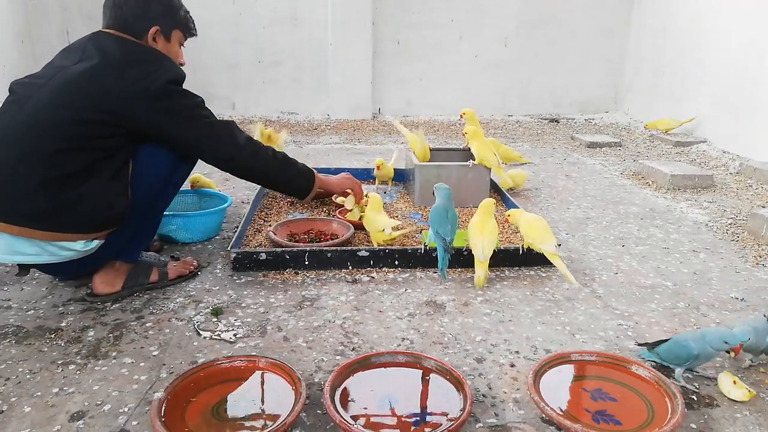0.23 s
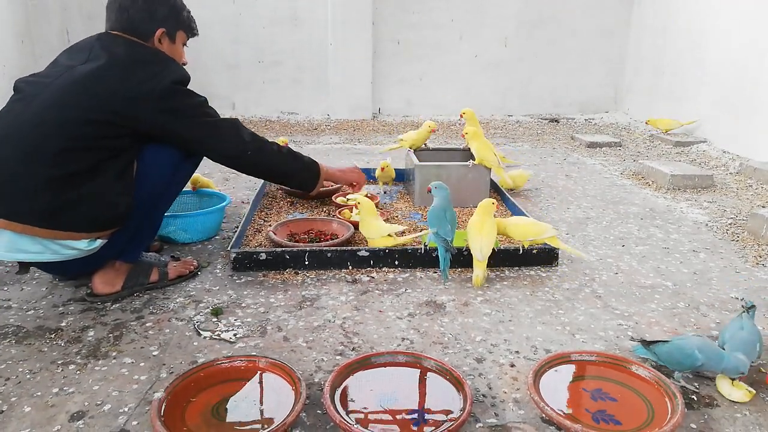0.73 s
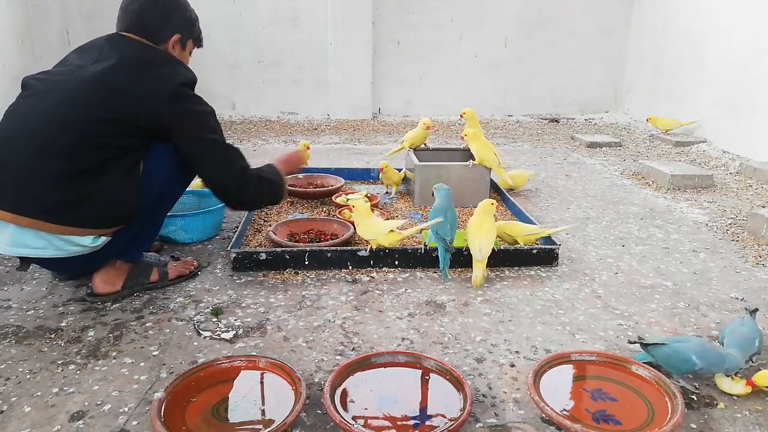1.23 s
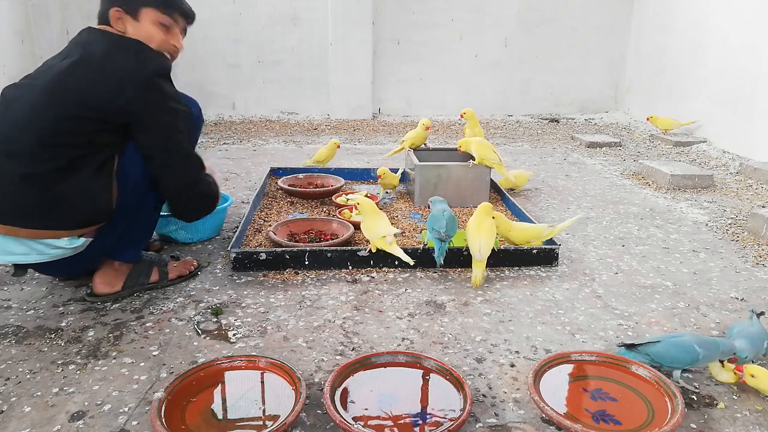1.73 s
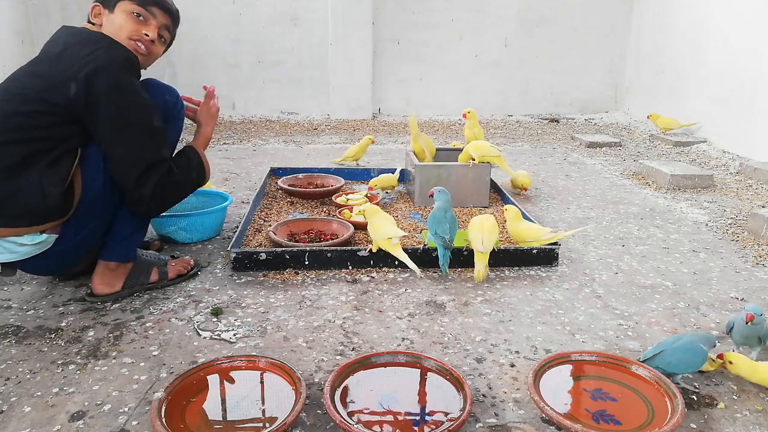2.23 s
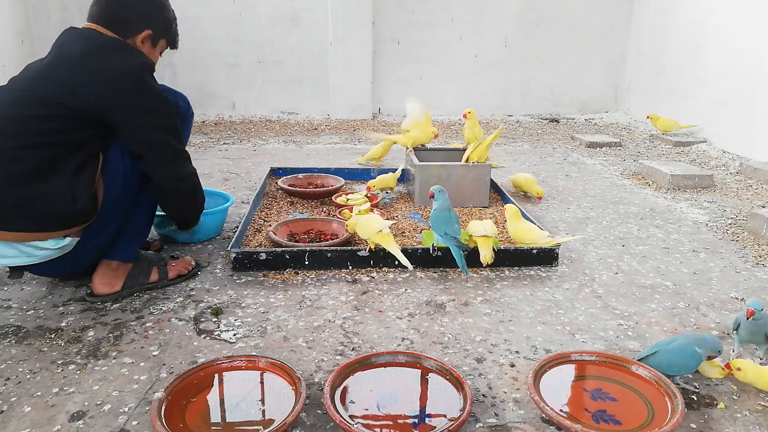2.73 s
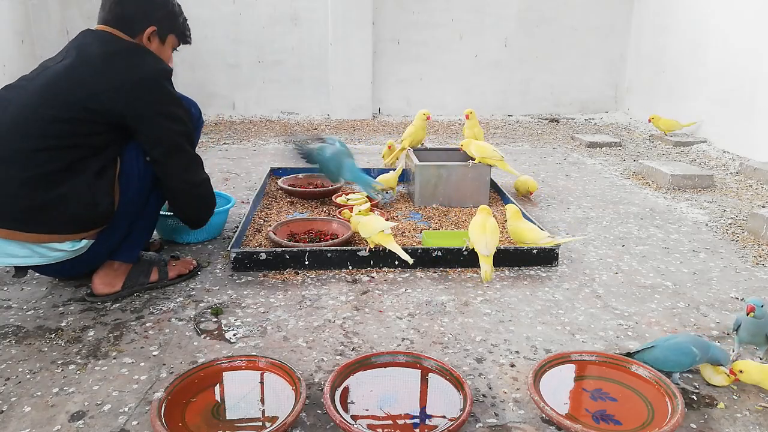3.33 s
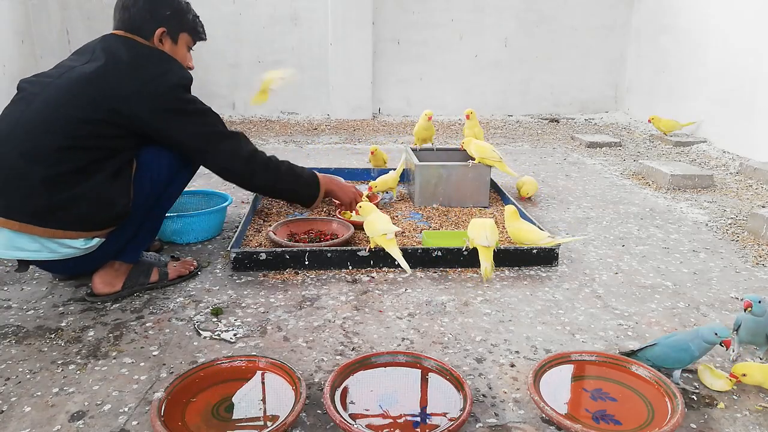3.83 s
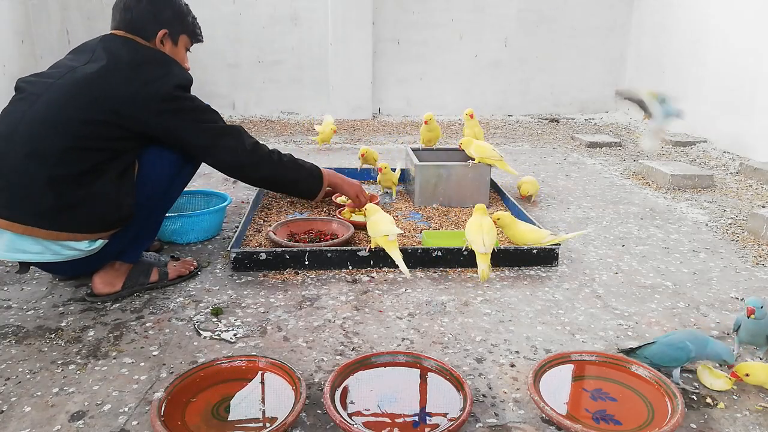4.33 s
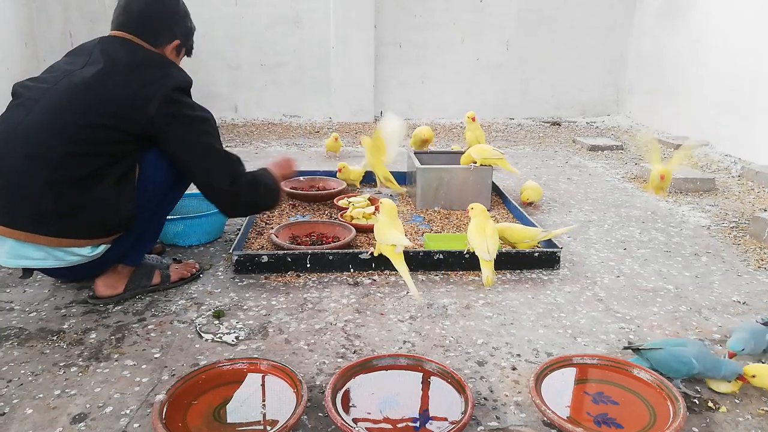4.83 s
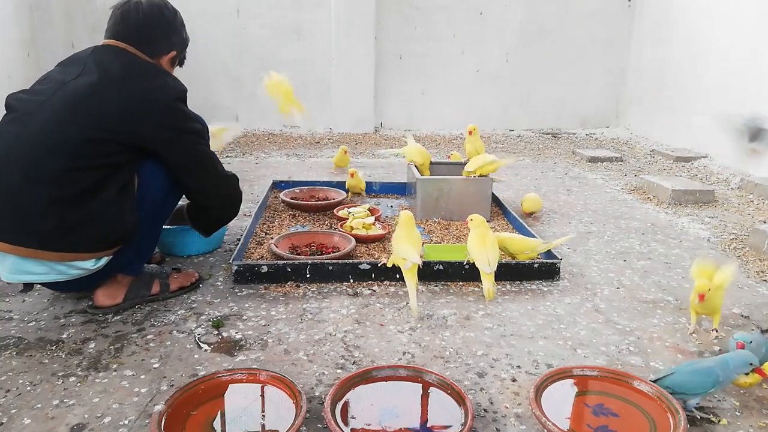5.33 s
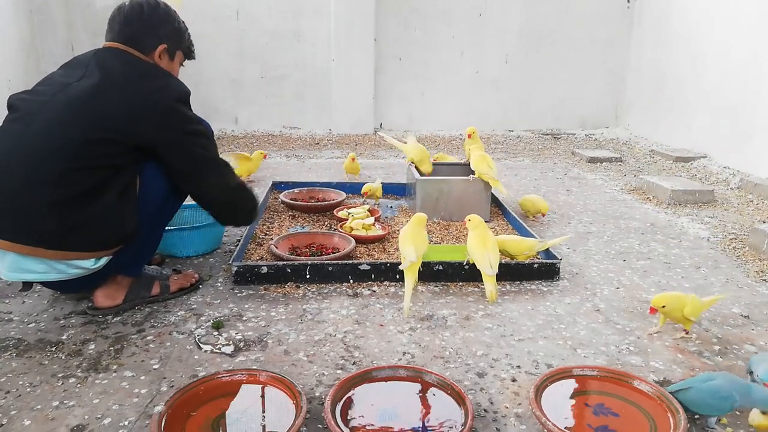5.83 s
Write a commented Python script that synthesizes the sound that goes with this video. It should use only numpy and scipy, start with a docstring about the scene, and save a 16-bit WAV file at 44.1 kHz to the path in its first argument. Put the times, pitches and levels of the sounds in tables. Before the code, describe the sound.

Four loud, raspy parakeet screeches in quick succession, then seed cracking, soft wing flutters and a more distant hoarse call over faint town rumble.

```python
"""A walled concrete aviary with parakeets at a seed tray. One gives four harsh screeches, a jittering
harmonic voice on a pitch arch, shaped by throat and beak; another answers hoarsely from farther off.
Husks snap, feed rustles, beaks tap, feet scuff, wingbeats puff air and distant birds chirp faintly.
A far horn sounds over the low rumble of the town. Gain control ducks under the screeches."""
import sys
import numpy as np
from scipy import signal
from scipy.fft import rfft, irfft
from scipy.io import wavfile
from scipy.ndimage import uniform_filter1d, minimum_filter1d

SR = 44100
rng = np.random.default_rng(int(sys.argv[2]) if len(sys.argv) > 2 else 0)


def log_audio(samples):
    """Write samples as a 16-bit WAV file to the path given in sys.argv[1]."""
    # one column per channel
    frames = np.atleast_2d(samples).T
    # limit to full scale, then quantise
    limited = np.clip(frames, -1, 1)
    pcm = np.round(limited * 32767).astype(np.int16)
    wavfile.write(sys.argv[1], SR, pcm)


N = 268480
TIME = np.arange(N) / SR


def amp(db):
    """Decibels to gain."""
    return 10 ** (np.asarray(db) / 20)


def unit(x):
    """Scales to rms 1."""
    return x / np.sqrt(np.mean(x ** 2) + 1e-20)


def steady(x):
    """Holds the short-time rms at 1."""
    return x / np.sqrt(abs(uniform_filter1d(x ** 2, size=500)) + 1e-9)


def read(points, hz):
    """Reads a spectrum on a log-frequency axis."""
    f, value = np.transpose(points)
    return np.interp(np.log(hz + 1), np.log(f + 1), value)


def colour(x, points):
    """Filters by a spectrum in dB."""
    size = x.shape[-1]
    return irfft(rfft(x) * amp(read(points, np.fft.rfftfreq(size, 1 / SR))), size)


def wobble(size, hz):
    """Random motion of rms 1, rolled off above hz."""
    f = np.fft.rfftfreq(size, 1 / SR)
    return unit(irfft(rfft(rng.standard_normal(size)) / np.sqrt(1 + (f / hz) ** 4), size))


def phase_rad(hz):
    """Integrates frequency to phase."""
    return 2 * np.pi * np.cumsum(hz) / SR


def add(mix, at_s, sound):
    """Mixes a sound in at a given time."""
    start = round(at_s * SR)
    sound = sound[..., max(-start, 0):]
    part = mix[..., max(start, 0):][..., :sound.shape[-1]]
    part += sound[..., :part.shape[-1]]


# wall decay: f/Hz, T60/s
WALL_T60 = [(300, 0.86), (1500, 0.38), (3500, 0.48), (6000, 0.39), (9000, 0.35), (14000, 0.27)]
# floor and wall reflections: left delay/s, right delay/s, level/dB re direct
ECHOES = [(.0021, 0.0018, 1.5), (.0068, 0.0092, -1), (0.0116, 0.013, -10.5), (0.018, .0205, -16),
          (0.028, 0.015, -9)]


def aviary(x, direct_db, wet_db, left_lag_s=0):
    """Direct sound, single reflections and a diffuse tail between bare walls."""
    count = SR // 20 - 20
    taps = np.zeros((2, SR))
    at = 300 + 20 * np.arange(count) + rng.integers(0, 20, (2, count))
    np.put_along_axis(taps, at, rng.choice([-1., 1.], at.shape), 1)
    hz, t, spectra = signal.stft(taps, SR, nperseg=256)
    decay = amp(-60 * t / read(WALL_T60, hz)[:, None])
    tail = signal.istft(spectra * decay, SR, nperseg=256)[1]
    room = amp(wet_db) * tail / np.linalg.norm(tail[0])
    room[0, round(max(left_lag_s, 0) * SR)] += amp(direct_db)
    room[1, round(max(-left_lag_s, 0) * SR)] += amp(direct_db)
    for left_s, right_s, db in ECHOES:
        room[[0, 1], [round(left_s * SR), round(right_s * SR)]] += amp(direct_db + db)
    return signal.fftconvolve(x[None], room, axes=1)[:, :N]


# town spectrum: f/Hz, gain/dB
RUMBLE_COLOUR = [(20, -1), (60, -3), (105, -4), (166, -11), (230, -15), (424, -18.5), (800, -19.5),
                 (1500, -24), (2500, -61.5)]
# town swell and ebb: t/s, relative level/dB
RUMBLE_LEVEL = [(0, -50), (.6, -55.5), (1.2, -56.5), (2.5, -48.5), (3.3, -55), (4.0, -54), (5.1, -52.5),
                (6.1, -53)]
# left-right likeness: f/Hz, correlation
RUMBLE_CORRELATION = [(60, 1), (130, 1), (290, 0.68), (640, -0.79), (1400, 0.42), (3000, 0)]


def town_rumble(gain_db=4, swell_db=2.5):
    """Swelling town noise, its bass alike at both microphone ports."""
    left, independent = rng.standard_normal((2, N))
    likeness = np.clip(read(RUMBLE_CORRELATION, np.fft.rfftfreq(N, 1 / SR)), -1, 1)
    right = irfft(likeness * rfft(left) + np.sqrt(1 - likeness ** 2) * rfft(independent), N)
    level_db = gain_db + np.interp(TIME, *np.transpose(RUMBLE_LEVEL)) + swell_db * wobble(N, 11)
    return unit(colour(np.array([left, right]), RUMBLE_COLOUR)) * amp(level_db)


# engine notes: f/Hz, relative level/dB
ENGINE_NOTES = [(120, -58), (212, -59.5), (285, -63)]


def engines(waver=0.0094):
    """Far engines drone on wavering notes, louder as they draw nearer."""
    drone = sum(amp(db) * wobble(N, 6.6) * np.sin(phase_rad(hz * (1 + waver * wobble(N, 2))))
                for hz, db in ENGINE_NOTES)
    return drone * amp(np.interp(TIME, [2.5, 4.6], [-5, 1.5]))


# hiss spectrum: f/Hz, gain/dB
HISS_COLOUR = [(410, -34), (700, -3), (1020, -7), (1110, -5.5), (1310, -0.5), (2430, -3), (3160, -3),
               (6230, -6), (9600, 2), (15200, -17), (16000, -18.5)]
# hiss before and after the screeches, one list each: t/s, relative level/dB
HISS_LEVEL = [
    [(0.0, -51), (0.236, -56.5), (0.432, -57), (0.664, -63.5), (0.932, -60), (1.248, -56), (1.35, -60.5)],
    [(2.75, -57), (3.04, -57), (3.57, -58), (3.88, -57.5), (5.41, -55.5), (5.72, -57), (6.0, -57)],
]


def feeding_hiss(gain_db=7, flicker_db=1.1):
    """Feeding birds blur into a restless hiss."""
    hiss = unit(colour(rng.standard_normal((2, N)), HISS_COLOUR))
    return hiss * amp(gain_db + np.interp(TIME, *np.vstack(HISS_LEVEL).T) + flicker_db * wobble(N, 20))


# horn partials: f/Hz, level/dB
HORN_CHORD = [(468, -75), (1130, -68), (1669, -72), (1739, -70)]


def horn(waver=0.0047):
    """A far vehicle horn holds a wavering chord."""
    chord = np.zeros(N)
    for hz, db in HORN_CHORD:
        flicker = 1 + 1.2 * wobble(N, 29)
        chord += amp(db) * flicker * np.sin(phase_rad(hz * (1 + waver * wobble(N, 34))))
    gate = np.interp(TIME, [.9, 1.05, 1.36, 1.45], [0, 1, 1, 0])
    return aviary(chord * gate, direct_db=1, wet_db=1)


# distant calls: t/s, length/s, f/Hz, width/Hz, level/dB
CHIRPS = [(-.04, 0.1, 1880, 610, -52), (0.396, 0.071, 3060, 1110, -57), (0.867, 0.15, 2940, 150, -67),
          (0.892, 0.1, 4640, 300, -64.5), (2.71, 0.18, 4930, 593, -50.5), (2.805, 0.06, 1422, 700, -48),
          (2.868, 0.08, 1466, 286, -44), (3.46, 0.18, 6370, 246, -61.5), (4.043, 0.39, 3560, 2200, -59.5)]


def chirps():
    """Distant bird calls, blurred to bands of noise."""
    out = np.zeros(N)
    for at_s, length_s, hz, width_hz, db in CHIRPS:
        t = np.arange(int(length_s * SR)) / SR
        call = wobble(len(t), width_hz / 2) * np.sin(2 * np.pi * hz * t)
        add(out, at_s, amp(db) * unit(call) * signal.windows.tukey(len(t), .6))
    return aviary(out, direct_db=1, wet_db=-2.5)


# soft rubs: t/s, length/s, centre f/Hz, level/dB
SCUFFS = [(.01, .12, 302, -63), (0.453, 0.099, 925, -58.5), (2.287, 0.13, 377, -49.5),
          (3.374, 0.067, 1230, -58), (4.384, .068, 600, -56), (4.8, 0.11, 800, -54.5),
          (5.007, 0.22, 278, -54.5), (5.239, 0.12, 312, -54)]


def scuffs():
    """Sandals, sleeves and feet on the tray rub: dull noise about an octave wide."""
    out = np.zeros(N)
    for at_s, length_s, hz, db in SCUFFS:
        size = int(length_s * SR)
        band = [(hz / 8, -50), (hz / 2, -12), (hz, 0), (hz * 2, -14), (hz * 8, -60)]
        brush = colour(rng.standard_normal(size), band)
        add(out, at_s, amp(db) * unit(brush * signal.windows.tukey(size, .7)))
    return np.array([out, out])


# flights: t/s, length/s, level/dB
FLIGHTS = [(-.1, 0.25, -57.5), (3.15, 0.52, -54.5), (4.2, 0.3, -54), (4.799, 0.58, -48)]
# air puff spectrum: f/Hz, gain/dB
WING_COLOUR = [(60, -4), (220, 6), (400, -0.5), (900, -7), (2000, -39.5), (6000, -19), (14000, -21)]


def wings(beat_hz=13):
    """Each wingbeat pushes a soft puff of air."""
    out = np.zeros(N)
    for at_s, length_s, db in FLIGHTS:
        size = int(length_s * SR)
        beat = np.sin(phase_rad(beat_hz * (1 + 0.094 * wobble(size, 4.8))) / 2) ** 2
        puffs = colour(rng.standard_normal(size), WING_COLOUR) * (0.25 + beat)
        add(out, at_s, amp(db) * unit(puffs) * signal.windows.tukey(size, .6))
    return aviary(out, direct_db=-12.5, wet_db=-7)


def pecks(count=70, softest_db=-50, range_db=8, ring_s=.003):
    """Small beaks tap at random, each tap with its own pitch."""
    out, t = np.zeros(N), np.arange(1500) / SR
    for when, pitch, force in rng.random((count, 3)):
        hz = 700 * 14 ** pitch
        tap = unit(colour(rng.standard_normal(len(t)), [(hz / 3, -25), (hz, 0), (hz * 2, -25)]))
        add(out, when * N / SR, amp(softest_db + range_db * force) * tap * np.exp(-t / ring_s))
    return aviary(out, direct_db=-7, wet_db=-1.5)


# seeds cracked and dropped, claws on the tray: t/s, level/dB, low-cut f/Hz
TICKS = [(0.168, -35.5, 4500), (0.32, -37, 2000), (.554, -35, 2000), (1.26, -29, 4630), (2.813, -34, 3500),
         (2.973, -38, 4000), (3.385, -34.5, 8000), (3.646, -27, 4000), (3.704, -25.5, 2500),
         (5.196, -35.5, 700), (5.27, -15.5, 200), (5.818, -34.5, 6000)]
# tick spectrum: f/Hz, gain/dB
TICK_COLOUR = [(300, -9.5), (900, -8.5), (2200, 1.5), (4200, -2.5), (6500, 5.5), (9300, 5.5), (12000, -1),
               (15500, -12.5)]
# feed stirred and scattered: t/s, length/s, level/dB
RUSTLES = [(0.409, 0.077, -55.5), (1.059, 0.27, -55), (1.264, 0.067, -51), (3.379, 0.17, -62),
           (3.654, 0.089, -48), (4.076, 0.096, -56.5), (5.662, 0.15, -55), (5.812, 0.16, -51.5),
           (5.908, 0.44, -50)]
# rustle spectrum: f/Hz, gain/dB
RUSTLE_COLOUR = [(880, -46), (1500, -14), (1700, -5), (1930, -7.5), (3500, -9.5), (4370, 0.5), (5780, -8.5),
                 (9630, 7), (15000, -23)]


def seeds(tick_s=0.00055, grains_per_s=1800, spread_db=1.5):
    """Single husks snap; stirred feed gives swarms of tiny clicks."""
    out, t = np.zeros(N), np.arange(1024) / SR
    for at_s, db, low_hz in TICKS:
        snap = colour(rng.standard_normal(len(t)), TICK_COLOUR)
        snap = unit(colour(snap, [(low_hz / 2, -20), (low_hz, 0)]))
        add(out, at_s, amp(db) * snap * np.exp(-t / tick_s))
    for at_s, length_s, db in RUSTLES:
        size = int(length_s * SR)
        progress = np.linspace(0, 1, size)
        clicks = amp(spread_db * np.minimum(rng.exponential(1, size), 4)) * rng.choice([-1, 1], size)
        hits = rng.random(size) < grains_per_s / SR
        envelope = unit(np.minimum(progress / 0.039, 1) * (1 - progress))
        add(out, at_s, amp(db) * unit(colour(clicks * hits, RUSTLE_COLOUR)) * envelope)
    return aviary(out, direct_db=2.5, wet_db=-6, left_lag_s=.0001)


# far bird's breath: f/Hz, gain/dB
BREATH_COLOUR = [(1000, -34), (2000, 6), (3300, -15), (5000, -1.5), (7000, 2.5), (9300, -3.5), (11000, -16),
                 (15000, -27)]


def far_bird(start_s=5.205, top_s=5.33, end_s=5.495, open_s=.07, close_s=.135, flatness=2.2):
    """A hoarse answer: chaotic vibration in two resonances that rise and swell as the beak opens."""
    t = np.arange(start_s, end_s, 1 / SR)
    gape = np.exp(-(abs(t - top_s) / np.where(t < top_s, open_s, close_s)) ** flatness)
    lower_hz = np.interp(gape, [0, 1], [1534, 2727])
    upper_hz = np.interp(gape, [0, 1], [3990, 4630])
    effort_db = np.interp(gape, [0, 1], [-35, -24])
    voice = amp(-7) * unit(colour(rng.standard_normal(len(t)), BREATH_COLOUR))
    for hz, width_hz, db in ((lower_hz, 190, 0), (upper_hz, 310, -4)):
        chaos = wobble(len(t), width_hz) + 1j * wobble(len(t), width_hz)
        voice += amp(db) * (chaos * np.exp(1j * phase_rad(hz))).real
    out = np.zeros(N)
    add(out, start_s, amp(effort_db) * voice * signal.windows.tukey(len(t), .28))
    return aviary(out, direct_db=-6.5, wet_db=-15, left_lag_s=-0.00023)


# voice by register, hoarse when low: f/Hz, gain/dB, treble/dB re body, roughness 0-1
REGISTER = [(1350, -4.5, -9.5, .6), (1518, -1, -3.5, 0.04), (1806, 3.5, -7, .08), (1970, 1.5, -4, .16),
            (2283, 4, 2.5, .11), (2980, -5.5, -2, 0.19)]
START_HZ, DIVE_CURVE, SLIDE_CURVE = 1394, 2.2, 1.6
ATTACK_S, RELEASE_S, RELEASE_DB = 0.0086, .024, -11.5
SWELL_DB_PER_S, ONSET_TREBLE_DB = 5.5, -3.5
LEAD_S, LEAD_ROUGH, LEAD_HZ_PER_S = .017, 0.9, 25000  # rising rasp before the voice catches
CRACK_AT_S, CRACK_S, CRACK_HZ = 2.096, .018, 1903  # voice break atop the third screech


def gesture(start_s, rise_s, suddenness, fall_s, top_hz, dive_s, shoulder_hz, end_hz,
            db, lead_db, settle_s, added_rough):
    """Pitch leaps, dives to a shoulder and slides down; effort, treble and roughness follow it."""
    t = np.arange(start_s - LEAD_S, start_s + rise_s + fall_s + RELEASE_S, 1 / SR)
    age_s = t - start_s
    past_top_s = np.maximum(age_s - rise_s, 0)
    leap = np.sin(np.pi / 2 * np.clip(age_s / rise_s, 0, 1)) ** suddenness
    leap_hz = START_HZ + (top_hz - START_HZ) * leap - LEAD_HZ_PER_S * np.maximum(-age_s, 0)
    dive_hz = (top_hz - shoulder_hz) * np.exp(-(past_top_s / dive_s) ** DIVE_CURVE)
    slide_hz = shoulder_hz + (end_hz - shoulder_hz) * (past_top_s / fall_s) ** SLIDE_CURVE
    pitch_hz = np.where(past_top_s > 0, slide_hz + dive_hz, leap_hz)
    pitch_hz[abs(t - CRACK_AT_S) < CRACK_S / 2] = CRACK_HZ
    pitch_hz = uniform_filter1d(pitch_hz, size=90)
    register_hz, *columns = np.transpose(REGISTER)
    gain_db, treble_db, rough = (np.interp(pitch_hz, register_hz, column) for column in columns)
    lead, unsettled = (np.clip(1 - age_s / span_s, 0, 1) for span_s in (ATTACK_S, settle_s))
    release = np.maximum(past_top_s - fall_s, 0) / RELEASE_S
    effort_db = db + gain_db + SWELL_DB_PER_S * (age_s - rise_s) + lead_db * lead + RELEASE_DB * release
    treble_db += (ONSET_TREBLE_DB - treble_db) * unsettled
    rough = np.clip(np.maximum(rough + added_rough, LEAD_ROUGH * unsettled ** 2), 0, .95)
    return t, pitch_hz, effort_db, treble_db, rough


# throat and beak response: f/Hz, gain/dB
THROAT = [(400, -57), (900, -16.5), (1300, -9.5), (2200, -6.5), (3000, 2.5), (3600, 7.5), (5000, -2.5),
          (5800, -8.5), (6700, -1), (7600, -3), (9300, 6), (10300, -2), (11400, -15.5), (14000, -21.5),
          (15500, -60)]
# voice box harmonics 1-9: level/dB
SYRINX_DB = [-5, 1, -5.5, -2, -2.5, -1.5, -3, -6, -7]


def screech(pitch_hz, effort_db, treble_db, rough,
            jitter=.045, shimmer=.26, rasp=.52, rattle=.6, rattle_hz=170):
    """A jittering harmonic voice with rasping air, shaped by the throat; it rattles at low pitch."""
    size = len(pitch_hz)
    phase = phase_rad(pitch_hz * (1 + jitter * rough * wobble(size, 900)))
    tone = sum(amp(db + read(THROAT, k * pitch_hz)) * (k * pitch_hz < SR * .45) * np.cos(k * phase)
               for k, db in enumerate(SYRINX_DB, 1))
    tone = steady(tone * (1 + shimmer * rough * wobble(size, 260)))
    air = unit(colour(rng.standard_normal(size), THROAT))
    voice = np.sqrt(1 - rough ** 2) * tone + rasp * rough * air
    # beak gape sets treble against body
    body = signal.sosfiltfilt(signal.butter(10, 6250, fs=SR, output="sos"), voice)
    voice = steady(body) + amp(treble_db + 0.93 * wobble(size, 51)) * steady(voice - body)
    # membranes slap below 1680 Hz
    slap = np.cos(phase_rad(rattle_hz * (1 + 0.15 * wobble(size, 60))))
    voice *= 1 + rattle * np.clip((1680 - pitch_hz) / 200, 0, 1) * slap
    return amp(effort_db + 0.5 * wobble(size, 110)) * voice * signal.windows.tukey(size, .03)


# calls: t/s, rise/s, suddenness, fall/s, top f/Hz, dive/s, shoulder f/Hz, end f/Hz,
# level/dB, lead-in/dB re call, rough onset/s, added roughness 0-1
SCREECHES = [(1.399, 0.052, 1.09, 0.16, 2548, .034, 2098, 1393, -18, -15.5, 0.026, 0),
             (1.751, 0.049, 1.43, 0.12, 2690, 0.019, 2030, 1403, -15, -3.5, 0.013, 0.1),
             (2.059, .028, 2.6, 0.15, 2980, 0.024, 2095, 1349, -14, -4, 0.042, .05),
             (2.379, .029, 2.01, .131, 2928, .024, 1873, 1204, -15, -2.5, 0.049, 0.01)]


def near_bird():
    """Four screeches in a run, to the right."""
    out = np.zeros(N)
    for row in SCREECHES:
        t, *controls = gesture(*row)
        add(out, t[0], screech(*controls))
    return aviary(out, direct_db=3, wet_db=5.5, left_lag_s=.00034)


def scene():
    """All sources, in stereo."""
    birds = near_bird() + far_bird() + chirps() + seeds() + pecks() + scuffs() + wings()
    return birds + horn() + town_rumble() + engines() + feeding_hiss()


# duller left microphone port: f/Hz, gain/dB
LEFT_PORT = [(100, -1.5), (2400, -2.5), (4400, -1.5), (6500, -2.5), (8500, -10), (15000, -12)]


def record(dry, threshold_db=-21, squeeze=0.61, hold_s=0.14, recover_db_per_s=38,
           ceiling=.9, edge_hz=16200):
    """Unequal ports, gain control that ducks, holds and recovers, then clipping and a band limit."""
    x = np.array([colour(dry[0], LEFT_PORT), colour(dry[1], [(3000, -1.8), (8500, -0.44)])])
    power_db = 10 * np.log10(abs(uniform_filter1d((x ** 2).mean(0), size=600)) + 1e-12)
    half = int(hold_s * SR / 2)
    peak_db = -minimum_filter1d(-power_db, size=2 * half + 1, origin=half)
    held_db = np.maximum.accumulate(peak_db + recover_db_per_s * TIME) - recover_db_per_s * TIME
    duck_db = squeeze * uniform_filter1d(np.maximum(held_db - threshold_db, 0), size=300)
    x = np.clip(x / amp(duck_db), -ceiling, ceiling)
    lowpass = signal.firwin(511, edge_hz, window=("kaiser", 9), fs=SR)
    return signal.oaconvolve(x, lowpass[None], "same")


dry = scene()
out = record(dry)
log_audio(out)
```